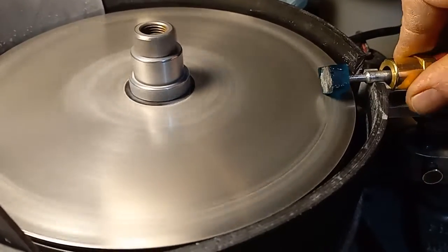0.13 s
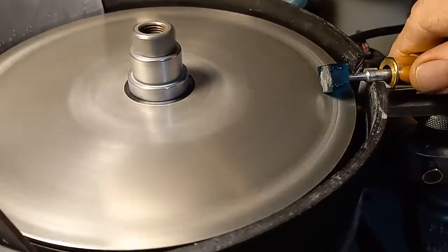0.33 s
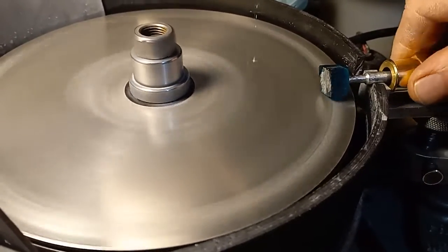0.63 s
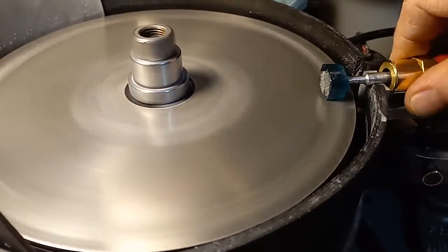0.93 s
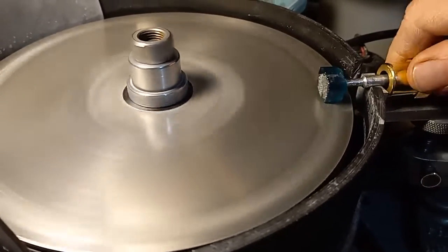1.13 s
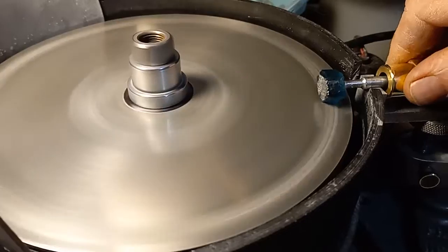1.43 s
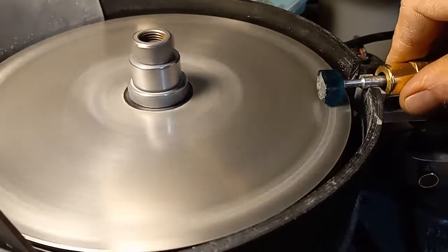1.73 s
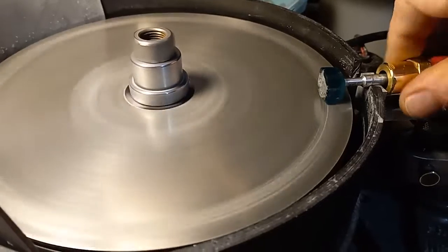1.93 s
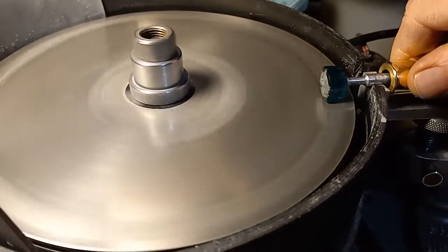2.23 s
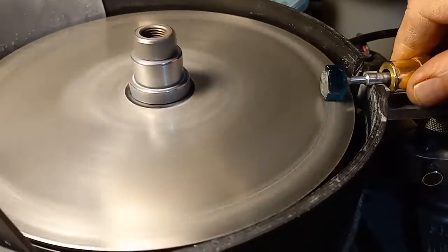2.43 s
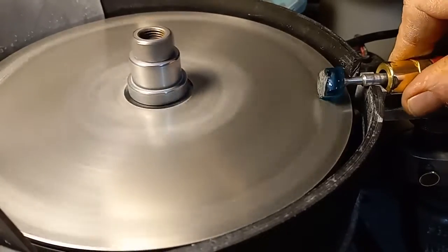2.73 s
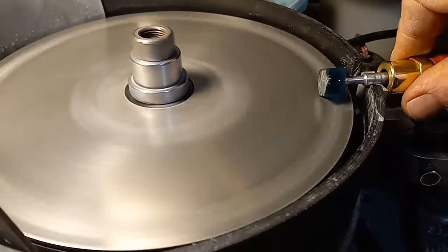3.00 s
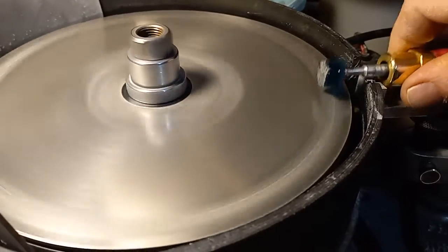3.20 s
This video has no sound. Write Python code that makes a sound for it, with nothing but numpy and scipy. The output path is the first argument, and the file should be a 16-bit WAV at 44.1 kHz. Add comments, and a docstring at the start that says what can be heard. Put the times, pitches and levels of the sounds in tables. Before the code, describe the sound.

Grinding of a gemstone on a fast metal lap, close up indoors: two harsh hissing strokes, a run of brief scrapes, another stroke, sparser catches, then a long final stroke; machine hum swells in the gaps.

```python
"""A bright hiss over a coarser rasp: a gemstone on its stick is ground on a spinning metal lap in a workshop.
Pressed strokes are noise filtered by the resonances of the disc; brief catches on its high spot
are shorter bursts, each with a tick of first contact. Sparse chips tick brightly, and a short echo follows.
Steady motor lines and machine noise lie beneath; the camera's gain control lifts them when the treble is weak."""
import sys
import numpy as np
from scipy import signal
from scipy.fft import rfft, irfft, next_fast_len
from scipy.io import wavfile
from scipy.ndimage import uniform_filter1d, minimum_filter1d, map_coordinates

SR = 44100
rng = np.random.default_rng(int(sys.argv[2]) if len(sys.argv) > 2 else 0)


def transcribe(signal):
    """Save signal, clipped to [-1, 1], as a 16-bit WAV file at the path in sys.argv[1]."""
    frames = np.atleast_2d(signal).T
    limited = np.clip(frames, -1, 1)
    pcm = np.round(limited * 32767).astype(np.int16)
    wavfile.write(sys.argv[1], SR, pcm)


N = 148176  # length in samples

# Colour of the grinding noise. Each row: frequency in Hz, relative left level in dB, relative right level in dB.
GRIND_COLOUR = [(45, -31, -33), (94, -1.5, -11), (170, -7.5, -18), (288, -3.5, -16), (540, -7.5, -17),
                (1330, -8, -22.5), (1650, -7.5, -15.5), (1810, -8.5, -24), (2050, -7, -15), (3220, -7, -11),
                (3500, -7.5, -14.5), (4570, -5.5, -10), (5760, -8, -8.5), (5870, -3, -7.5),
                (6370, -7.5, -4.5), (7270, -5.5, -3.5), (7900, -2.5, -6), (8620, 6.5, -23),
                (8850, -1.5, -21), (9270, -7.5, -30), (10000, -11.5, -19), (10000, -17, -8.5),
                (12300, -6.5, -12.5), (13300, 1, -8), (15800, -6, -22)]
# Likeness of the grinding noise at the two microphones. Each row: frequency in Hz, left-right correlation.
GRIND_LIKENESS = [(100, 0.28), (1400, 0.021), (7000, 0), (15000, 0.21)]
# Likeness of the machine at the two microphones. Each row: frequency in Hz, left-right correlation.
MOTOR_LIKENESS = [(60, 0.87), (300, 0.87), (700, 0.81), (1500, 0.057), (10000, 0.035)]

HUM_TRIM_DB, HUM_WANDER_RAD = -20.5, 0.53  # trim of the motor lines; their phase wander
MOTOR_NOISE_DB = -40.5  # before the resonances of the disc
ROOM_DB = -14  # echo relative to the stone
RIPPLE_STEP_HZ = 70.3  # spacing of the weaker modes
CHIPS_PER_S, CHIP_DECAY_S, CHIP_LOW_CUT_HZ = 150, 0.00058, 12000
CHIP_DB = -18  # relative to the hiss
TURN_HZ = 16.45  # turns of the disc a second
HIGH_SPOT_S = 1.346  # a moment when the high spot passes the stone
TOUCH_S = 0.0093  # time for a stroke to land or leave
CATCH_ATTACK_S = 0.00051
CATCH_PEAK, CATCH_WIDTH = 0.52, 0.48  # shares of the length of a catch
TICK, TICK_DECAY_S = 0.38, 0.0014  # gain of the first contact relative to the swell; its decay
HISS_TRIM_DB, RASP_TRIM_DB, SPLIT_HZ = 3, 3.5, 4400  # trims, and where hiss and rasp meet
GRAIN_DB, CHATTER_DB = 2, 0.75  # swing at random knots: single grains; chance chatter
SPOTS_DB = -0.36  # effect of the uneven grit on the hiss
RUNOUT_DB = 1.27  # the rasp swings up and down by this once a turn
LOW_CUT_HZ, TOP_HZ, CEILING = 42, 15800, 0.92
TARGET_DB, SQUEEZE, BOOST_DB = -19, 0.73, 21  # treble target; dB of lift per dB below it; greatest lift
AHEAD_S, HOLD_S, RELEASE_S = 0.006, 0.019, 0.044


def amp(db):
    """Convert a level in decibels to a linear amplitude ratio."""
    return 10 ** (np.asarray(db) / 20)


def unit(x):
    """Normalise the mean power, giving rms 1."""
    return x / np.sqrt(np.mean(x ** 2) + 1e-20)


def along(points, hz, column=1):
    """Interpolate one column of a frequency table on a logarithmic frequency axis."""
    table = np.transpose(points)
    return np.interp(np.log(hz + 1), np.log(table[0] + 1), table[column])


def wander(position):
    """Random modulation: a smooth curve through a random knot at every whole position."""
    knots = rng.standard_normal(int(position.max()) + 4)
    return map_coordinates(knots, [position])


def filtered(x, response):
    """Linear filtering: multiply the spectrum by a frequency response."""
    size = next_fast_len(N + SR // 2)
    hz = np.fft.rfftfreq(size, 1 / SR)
    return irfft(rfft(x, size) * response(hz), size)[..., :N]


def rush(colour, alike):
    """Partly coherent stereo noise of rms 1: sum and difference of independent mid and side noises."""
    def mid_side(hz):
        half_angle = np.arccos(np.clip(along(alike, hz), -1, 1)) / 2
        return np.array([np.cos(half_angle), np.sin(half_angle)])

    mid, side = filtered(rng.standard_normal((2, N)), mid_side)
    stereo = np.array([mid + side, mid - side])
    return unit(filtered(stereo, lambda hz: amp([along(colour, hz, 1), along(colour, hz, 2)])))


def disc(hz):
    """Modal resonance: peaks and dips of the disc and stick, with weaker modes drawn afresh at each call."""
    # Each row: frequency in Hz, width in Hz, lift in dB.
    resonances = [(2563, 83, 3.5), (4343, 71, 2), (5280, 120, 6), (6076, 120, 7.5), (6700, 60, 6),
                  (6400, 70, -4.5), (6920, 110, 9), (7330, 70, 7), (7760, 51, 8.5), (8550, 150, -7.5),
                  (10560, 100, 8.5), (11400, 90, 11), (13100, 150, 0.5), (14600, 79, -16)]
    # Weaker modes in between. Each row: frequency in Hz, depth in dB at a random knot of 1.
    ripple_depth = [(1200, -1), (3000, 1.5), (7000, .7), (15000, .8)]
    modes_db = sum(db / (1 + (2 * (hz - f) / width) ** 2) for f, width, db in resonances)
    ripple_db = along(ripple_depth, hz) * wander(hz / RIPPLE_STEP_HZ)
    return amp(modes_db + ripple_db)


def machine_noise():
    """Broadband noise: rumble of the machine and swish of the spinning disc, shaped by its resonances."""
    # Each row: frequency in Hz, relative left level in dB, relative right level in dB.
    noise_colour = [(25, -41, -45), (45, -45, -32), (108, 1.5, -2.5), (167, -4.5, -6.5), (312, 3, 5),
                    (486, -4, -10.5), (517, -11, -15.5), (686, 4, -4.5), (926, -8, -4), (1050, -35.5, -1),
                    (1400, -8.5, -19), (1460, -26, -53), (1590, -4.5, -20.5), (2000, -27.5, -25),
                    (2850, -19, -22), (3400, -18.5, -19), (4000, -16.5, -15.5), (6500, -19, -13),
                    (7350, -18.5, -11), (8500, -10, -28), (10000, -36, -29), (10600, -23, -18.5),
                    (13400, -12.5, -13), (15600, -19, -19)]
    return amp(MOTOR_NOISE_DB) * filtered(rush(noise_colour, MOTOR_LIKENESS), disc)


def motor_hum():
    """Phase modulation: lines of the motor and bearings made slightly unsteady by a wandering phase."""
    # Each row: frequency in Hz, level in dB before the trim, left minus right level in dB.
    hum_lines = [(73.3, -29.5, 2.5), (295.7, -38, 5), (330, -42.5, -12), (352.5, -44, 3), (431, -46, -24.5),
                 (717, -49, 7), (829, -43, -13), (909.8, -45, -6), (1039, -37.5, 10), (1737, -44, -1),
                 (1777, -38, 7)]
    t = np.arange(N) / SR
    hum = np.zeros((2, N))
    for hz, db, pan_db in hum_lines:
        apart = np.arccos(np.clip(along(MOTOR_LIKENESS, hz), -1, 1)) / 2
        phase = 2 * np.pi * (hz * t + rng.random()) + HUM_WANDER_RAD * wander(t * 25)
        side_db = np.array([[pan_db], [-pan_db]]) / 2
        gain = np.sqrt(2) * amp(db + HUM_TRIM_DB + side_db)
        hum += gain * np.sin([phase + apart, phase - apart])
    return hum


def room(x):
    """Reverberation: convolution with decaying noise, whose decay time depends on frequency."""
    # Each row: frequency in Hz, time to decay by 60 dB in seconds.
    decay_times = [(200, 0.07), (2000, .16), (12000, 0.069)]
    hz, t, spectrum = signal.stft(rng.standard_normal((2, SR // 3)), SR, nperseg=256)
    decay = amp(-60 * t / along(decay_times, hz)[:, None])
    tail = signal.istft(spectrum * decay, SR, nperseg=256)[1]
    return signal.fftconvolve(x, tail / np.linalg.norm(tail[0]), axes=1)[:, :N]


def chips(t):
    """Random impulses: chips break off at chance moments as bright decaying noise, scaled to rms 1."""
    breaks = rng.random(N) < CHIPS_PER_S / SR
    sizes = breaks * (1 + rng.exponential(size=N))
    bursts = signal.fftconvolve(sizes, np.exp(-t[:SR // 100] / CHIP_DECAY_S))[:N]
    noise = bursts * rush(GRIND_COLOUR, GRIND_LIKENESS)
    return unit(filtered(noise, lambda hz: 1 - 1 / (1 + (hz / CHIP_LOW_CUT_HZ) ** 10)))


def grit(t, count=26):
    """Periodic modulation: coarse and fine spots around the disc pass the stone again every turn."""
    spots = unit(rng.standard_normal(count))
    return map_coordinates(spots - spots.mean(), [t * TURN_HZ % 1 * count], mode="grid-wrap")


def contact(t):
    """Amplitude envelopes of hiss and rasp: contact drives both in long strokes and brief catches."""
    # One list per stroke. Each row: time in seconds, hiss level in dB, rasp level in dB, before the trims.
    strokes = [
        [(0.0, -15, -22.5), (0.014, -17.5, -28), (0.2, -18, -28.5), (0.234, -18.5, -32.5), (0.246, -17, -26.5),
         (0.27, -19, -31.5), (0.312, -21.5, -35.5), (0.32, -22.5, -37), (0.335, -42, -49)],
        [(0.405, -22, -40), (0.433, -20.5, -31.5), (0.453, -21.5, -37.5), (0.499, -18, -32),
         (0.521, -23.5, -41.5), (0.555, -18, -29.5), (0.603, -19.5, -37), (0.623, -15, -24), (0.645, -31, -43),
         (0.651, -21.5, -38), (0.689, -16.5, -27), (0.705, -38, -44)],
        [(1.368, -35, -46), (1.376, -17.5, -30.5), (1.406, -17, -25), (1.426, -16, -27.5), (1.582, -17, -26),
         (1.726, -17.5, -28), (1.734, -20, -32.5), (1.78, -16, -25), (1.804, -21, -34), (1.842, -15.5, -26),
         (1.85, -30, -40), (1.856, -47, -37)],
        [(2.418, -28, -46), (2.43, -15, -25), (2.45, -21.5, -32.5), (2.482, -17, -25.5), (3.05, -18.5, -29.5),
         (3.066, -21, -36), (3.102, -18, -28), (3.154, -22, -38.5), (3.172, -17.5, -32), (3.19, -28, -44.5),
         (3.226, -20.5, -36.5), (3.245, -32.5, -53)],
    ]
    # Catches on the high spot. Each row: start in seconds, length in seconds,
    # hiss level in dB, rasp level in dB, before the swell and the trims.
    catches = [(.338, 0.015, -24, -41), (0.359, 0.025, -18.5, -34.5), (0.919, 0.012, -19, -41),
               (.975, 0.017, -16, -23), (1.034, 0.025, -16, -27.5), (1.1, 0.013, -17.5, -29),
               (1.157, 0.023, -16.5, -28.5), (1.219, 0.016, -17, -31), (1.276, 0.025, -17, -27),
               (1.336, 0.026, -15.5, -25.5), (1.861, 0.015, -27, -42), (1.883, 0.025, -19, -28),
               (1.955, 0.0046, -20, -32), (2.013, .012, -20.5, -36.5), (2.133, 0.013, -24, -39.5),
               (2.254, .012, -27.5, -42), (2.367, 0.018, -18, -27), (2.402, 0.012, -21.5, -38)]
    strength = np.zeros((2, N))
    for rows in strokes:
        s, *levels = np.transpose(rows)
        touch = np.clip(np.minimum(t - s[0], s[-1] - t) / TOUCH_S + 1, 0, 1)
        strength += touch * amp([np.interp(t, s, level) for level in levels])
    for start, length, hiss_db, rasp_db in catches:
        age = np.maximum(t - start, 0)
        attack = 1 - np.exp(-age / CATCH_ATTACK_S)
        swell = np.exp(-((age / length - CATCH_PEAK) / CATCH_WIDTH) ** 2)
        tick = TICK * np.exp(-age / TICK_DECAY_S)
        strength += amp([[hiss_db], [rasp_db]]) * attack * (swell + tick)
    return strength


def grinding():
    """Friction excitation: dense grains scratch the stone and ring the disc, as bright hiss and coarser rasp."""
    t = np.arange(N) / SR
    grains = rush(GRIND_COLOUR, GRIND_LIKENESS) * amp(GRAIN_DB * wander(t * 2500))
    scratch = filtered(grains, disc)
    low = filtered(scratch, lambda hz: 1 / (1 + (hz / SPLIT_HZ) ** 6))
    high = scratch - low
    chatter_db = CHATTER_DB * wander(t * 380)
    hiss = unit(high * amp(SPOTS_DB * grit(t) + chatter_db)) + amp(CHIP_DB) * chips(t)
    high_spot = np.cos(2 * np.pi * TURN_HZ * (t - HIGH_SPOT_S))
    rasp = unit(low * amp(chatter_db + RUNOUT_DB * high_spot))
    hiss_strength, rasp_strength = contact(t)
    return amp(HISS_TRIM_DB) * hiss_strength * hiss + amp(RASP_TRIM_DB) * rasp_strength * rasp


def scene():
    """Superposition of the stone on the disc, its echo and the machine."""
    stone = grinding()
    echo = amp(ROOM_DB) * room(stone)
    return stone + echo + motor_hum() + machine_noise()


def record(dry):
    """Dynamic compression: lift where treble is weak, duck where it is loud, round peaks and limit the band."""
    dry = filtered(dry, lambda hz: 1 - 1 / (1 + (hz / LOW_CUT_HZ) ** 6))
    treble = filtered(dry, lambda hz: hz > 4000)
    power = uniform_filter1d(np.mean(treble ** 2, axis=0), size=130)
    level_db = 10 * np.log10(abs(power) + 1e-12)
    allowed_db = np.clip(SQUEEZE * (TARGET_DB - level_db), 0, BOOST_DB)
    # the least lift allowed from HOLD_S before each moment to AHEAD_S after it
    ahead, hold = int(AHEAD_S * SR), int(HOLD_S * SR)
    least_db = minimum_filter1d(allowed_db, ahead + hold + 1, origin=(hold - ahead) // 2)
    duck_db = BOOST_DB - least_db
    # after each peak the ducking in dB dies away exponentially
    decay = np.arange(N) / SR / RELEASE_S
    fading_db = np.exp(np.maximum.accumulate(np.log(duck_db + 1e-6) + decay) - decay)
    loud = dry * amp(BOOST_DB - uniform_filter1d(fading_db, size=200))
    rounded = loud / (1 + (loud / CEILING) ** 10) ** (1 / 10)
    return filtered(rounded, lambda hz: hz < TOP_HZ)


dry = scene()
out = record(dry)
transcribe(out)
```